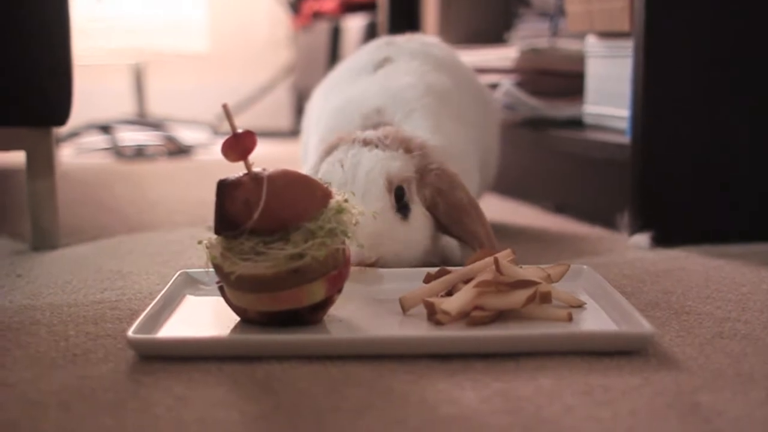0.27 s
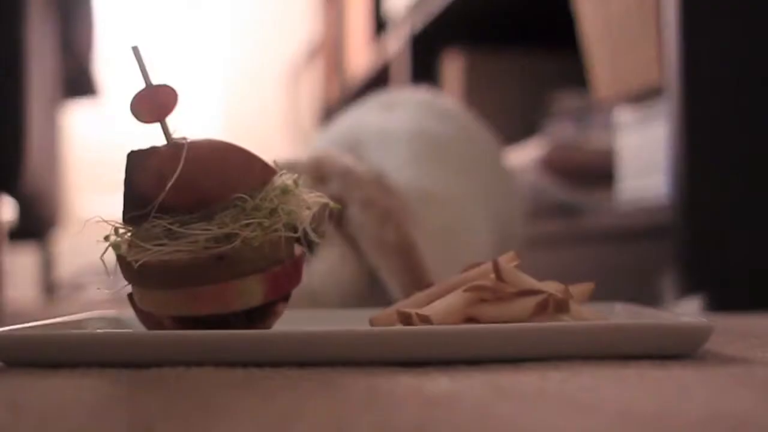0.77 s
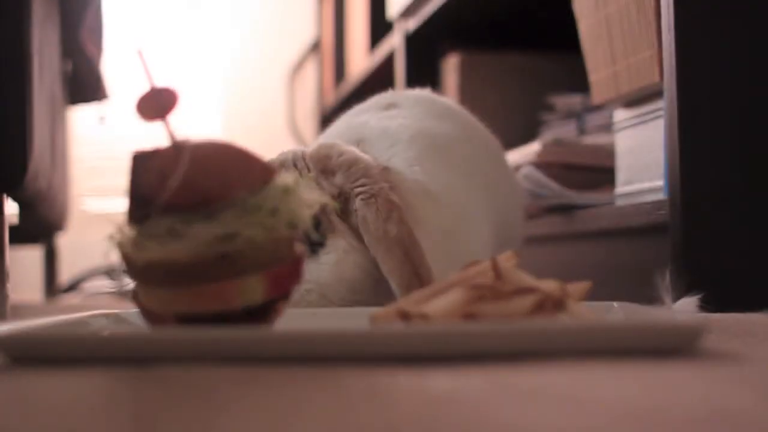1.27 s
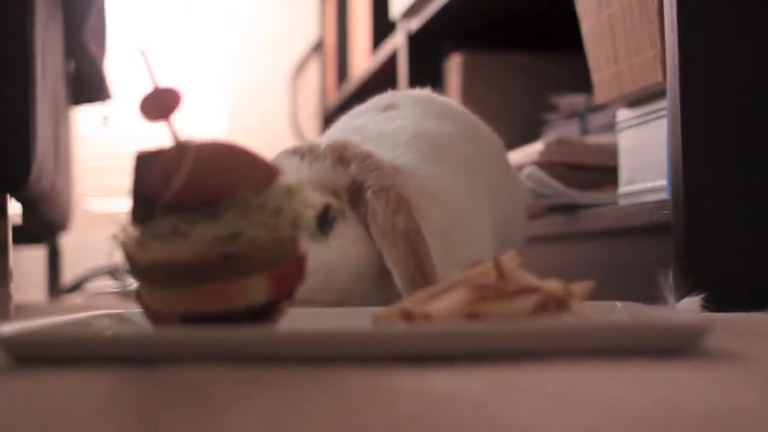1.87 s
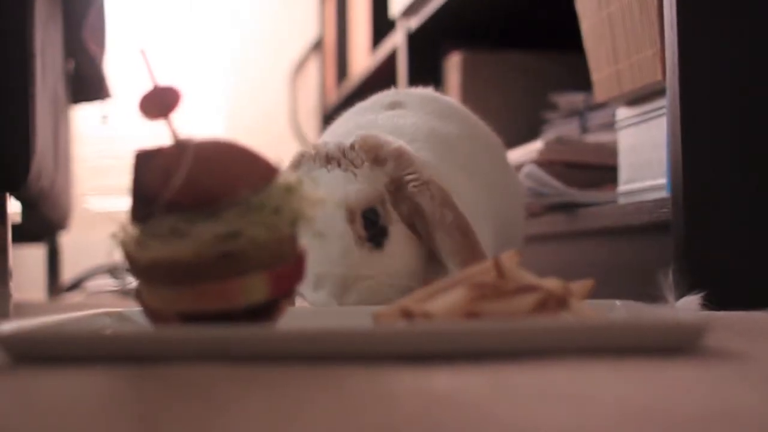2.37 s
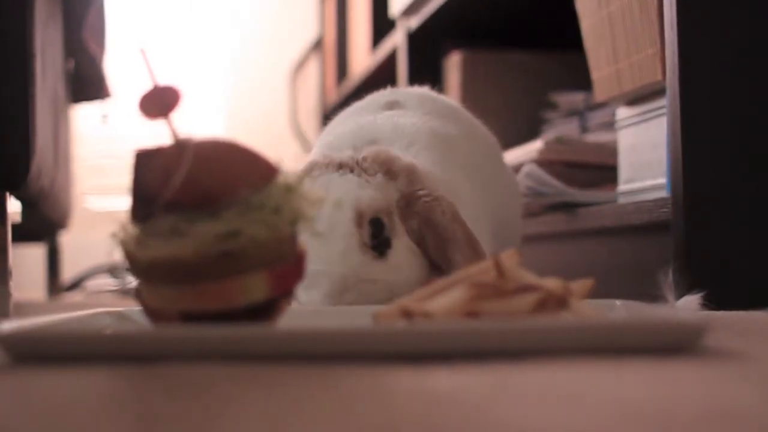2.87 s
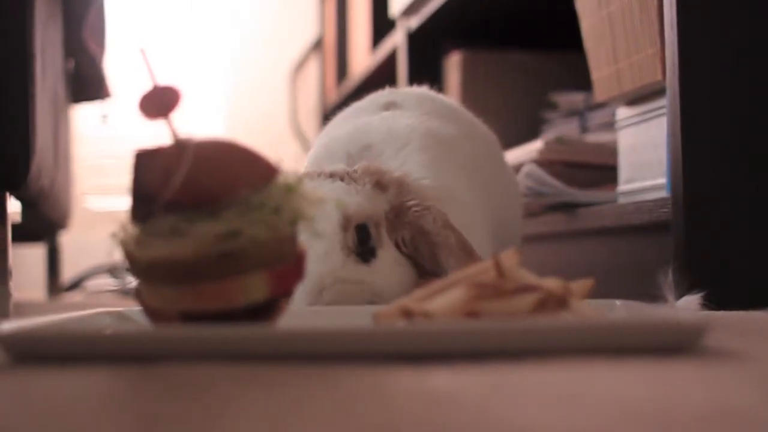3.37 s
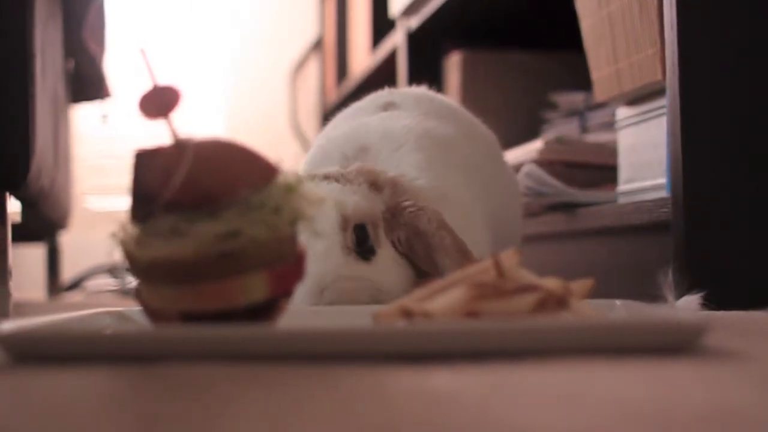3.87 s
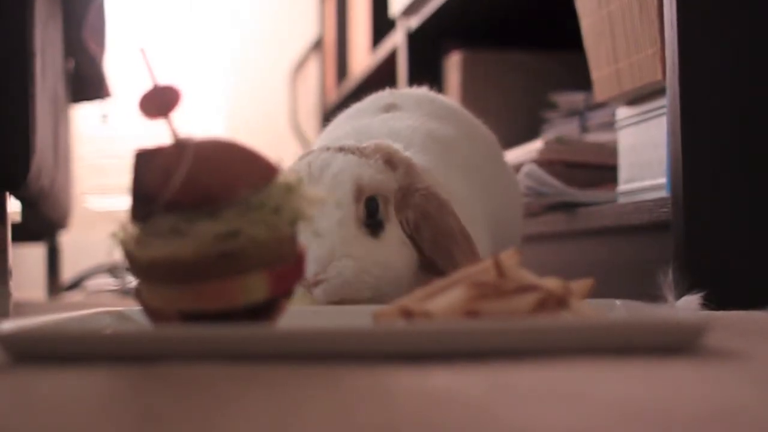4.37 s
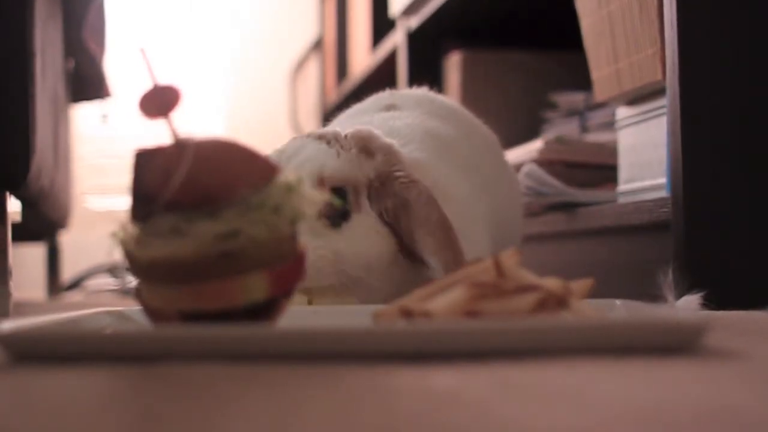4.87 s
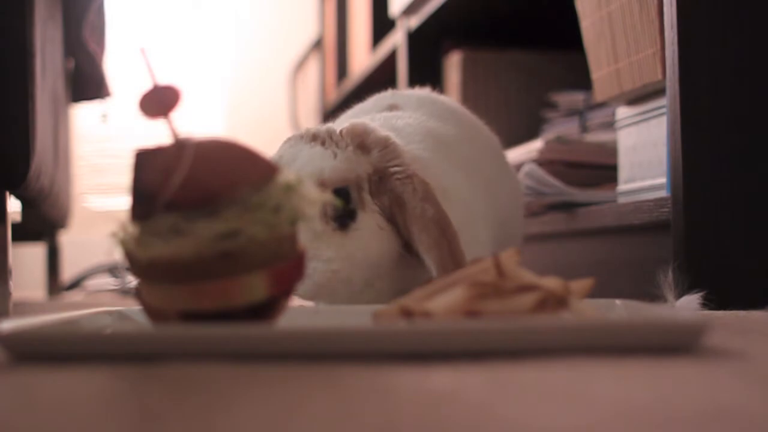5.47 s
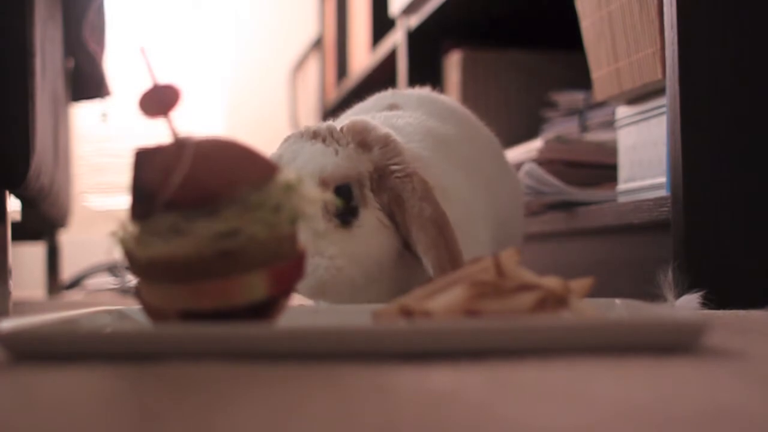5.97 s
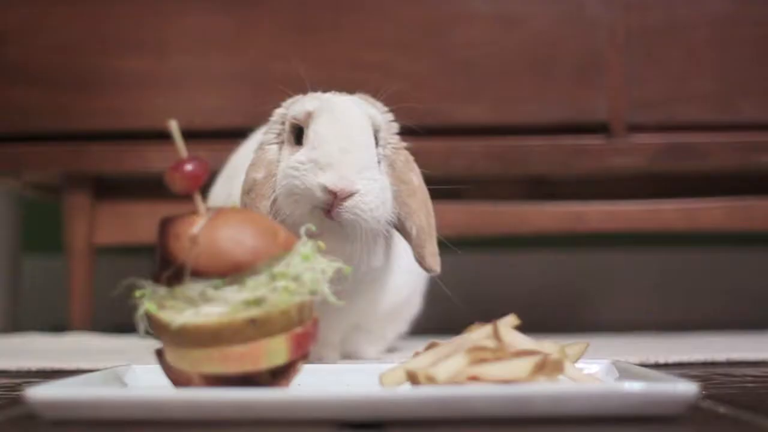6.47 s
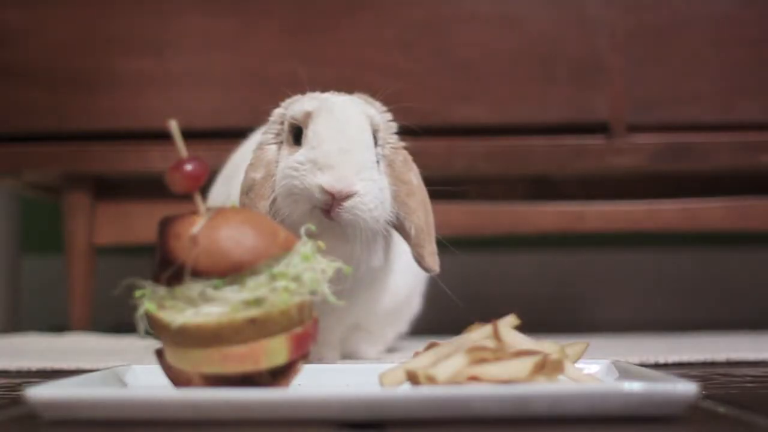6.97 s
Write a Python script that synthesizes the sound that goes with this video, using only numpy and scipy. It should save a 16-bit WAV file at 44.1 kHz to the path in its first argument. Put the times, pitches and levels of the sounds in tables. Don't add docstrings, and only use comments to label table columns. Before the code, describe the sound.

Close, quiet indoor rabbit chewing: hard little plate bounces, a burst of wet crunching, sparse ticks and lip clicks, two stem cracks, then renewed munching.

```python
import sys
import numpy as np
from scipy import signal
from scipy.fft import rfft, irfft, next_fast_len
from scipy.io import wavfile
from scipy.ndimage import uniform_filter1d, map_coordinates

SR = 44100
rng = np.random.default_rng(int(sys.argv[2]) if len(sys.argv) > 2 else 0)


def pcm_store(signal):
    levels = np.round(np.clip(np.atleast_2d(signal), -1, 1) * 32767)
    wavfile.write(sys.argv[1], SR, levels.astype(np.int16).T)


def convert_level_to_amplitude(level_db):
    exponent = np.asarray(level_db, float) / 20
    return 10 ** exponent


N = 317916

HISS_DB, HUM_DB, DEEP_DB = -60, -65.5, -76
CLICK_CYCLES, NIP_CYCLES, CLACK_CYCLES, THUMP_CYCLES = 2.2, 3.0, 4.2, 2.1
ROUNDNESS = 1.27
BITE_RISE = 0.6
GRIND_RISE_S, GRIND_FALL_S = 0.043, 0.074
SNATCH_RISE_S, SNATCH_FALL_S = 0.0063, 0.027
PUFF_RISE_S = 0.011
SQUEAK_ROUGH, SQUEAK_GRIT = 0.8, 0.3
FARTHER_S, FARTHER_DB = 6.568, -5
SNAP_ROOM_DB = -8
TOP_HZ = 15830

# pitch_hz, level_db (per Hz)
HISS_COLOUR = [(150, -32), (250, -3), (470, -8), (1360, -11), (2890, -13), (9830, -17), (14200, -20),
               (16300, -27)]
# peak_s, level_db, rise_s (20 dB), fall_s (20 dB)
STIRS = [
    (.5, -59, 0.7, 0.38),
    (1.89, -74, 2, .5),
    (2.4, -66, 1, 0.42),
    (6.05, -68, 1, 0.64),
]
# peak_s, level_db, rise_s (20 dB), fall_s (20 dB)
PASSES = [
    (1.45, -77, .8, 0.55),
    (3.1, -67.5, 1, 0.85),
    (5.52, -64.5, 1.5, 1),
    (6.75, -68, -2.5, 0.2),
]
# peak_s, level_db, rise_s (20 dB), fall_s (20 dB)
SWAYS = [
    (6.72, -63, -0.1, 0.4),
    (1.8, -71, 0.3, 0.16),
]
# start_s, peak_db, pitch_hz
LIP_CLICKS = [(0.114, -48, 1730), (1.267, -46, 1200), (1.435, -43, 1810), (1.607, -46, 1400),
              (1.825, -28, 1330), (3.055, -43, 1460), (3.067, -48, 1450), (3.448, -46, 1520),
              (3.675, -46, 1400), (3.77, -42.5, 1260), (3.991, -48.5, 1200), (4.0, -49, 920),
              (4.194, -49, 1330), (4.289, -45.5, 1260), (5.114, -52, 1340), (5.45, -48, 1360),
              (5.462, -52, 1420), (5.745, -41, 1040), (6.199, -49, 915), (6.442, -47.5, 1360)]
# start_s, peak_db, pitch_hz
NIPS = [
    (1.805, -33.5, 2630),
    (2.7, -43, 3220),
    (7.017, -38, 2590),
]
# start_s, peak_db, pitch_hz
CLACKS = [
    (0.136, -40.5, 1470),
    (1.713, -38, 2500),
    (4.323, -38.5, 2220),
]
# start_s, peak_db, pitch_hz
THUMPS = [
    (1.372, -50, 580),
    (4.431, -53.5, 270),
    (3.2, -52.5, 280),
    (4.629, -51, 226),
    (6.058, -56, 568),
]
# start_s, peak_db
VEIN_TICKS = [(0.2648, -43), (0.3087, -43), (1.267, -45), (2.811, -44.5), (2.8405, -48), (3.6764, -50),
              (3.8911, -53.5), (3.9074, -48), (3.9234, -45), (3.9814, -41), (4.0003, -41), (4.2901, -46),
              (4.3271, -52.5), (4.3635, -44), (4.3884, -48), (4.5067, -48), (4.7237, -43), (4.7404, -35.5),
              (4.7844, -39), (4.9606, -49), (4.9774, -56), (5.0214, -44), (5.2111, -46), (5.23, -39.5),
              (5.2514, -42), (5.4076, -41), (5.4274, -42), (6.4433, -50), (6.9486, -50)]
# start_s, peak_db, side (push or pull)
CELL_POPS = [(1.721, -29, -1), (1.7336, -34, 1), (1.918, -23, 1), (1.935, -25.5, -1), (1.972, -21, 1),
             (6.636, -43, 1), (6.759, -19.5, 1), (6.7628, -21, 1), (6.77, -29, 1), (6.776, -27, -1),
             (6.8115, -37, 1), (6.8149, -37, 1), (6.832, -34, -1)]
# start_s, peak_db, hardness (0-1)
BOUNCES = [
    (0.551, -15.5, 1),
    (0.587, -20, 0.55),
    (0.604, -23.5, 0.37),
    (0.632, -33, 0.22),
]
# pitch_hz, width_hz, level_db
PLATE = [(127, 21, 0), (325, 340, -3.5), (715, 220, 4), (1200, 420, -1.5), (2300, 240, -5),
         (3850, 320, -11.5)]
# middle_s,
# peak_db, pitch_hz, half_length_s
SLIPS = [(.871, -40.5, 920, .0012), (0.8713, -40, 337, 0.004), (2.7394, -44, 2300, 0.00092),
         (2.744, -49, 2500, 0.0034), (2.779, -46.5, 2300, .003), (2.785, -44, 2380, .003),
         (2.813, -38, 2370, 0.0017), (2.826, -37, 2400, 0.0016), (2.839, -39, 2600, 0.0014),
         (2.842, -43, 1900, 0.0021), (2.847, -42, 3100, 0.0029), (4.419, -47.5, 430, 0.0009),
         (5.344, -45.5, 300, 0.0018), (5.35, -50, 240, 0.002), (5.5826, -37.5, 1150, 0.00043),
         (5.583, -47, 2900, .001), (5.585, -34, 1600, .001), (5.588, -42, 1500, .0015),
         (5.593, -49, 1700, 0.0017), (5.611, -40.5, 3880, 0.00078), (5.613, -33.5, 2630, 0.00073),
         (5.613, -41, 1540, 0.0023), (5.6305, -36.5, 1490, 0.00027), (5.632, -38, 2140, 0.0014),
         (5.636, -43, 2190, 0.0039), (6.642, -34.5, 1200, 0.007), (6.651, -40, 1230, 0.0039),
         (6.655, -38, 1470, 0.0037), (6.664, -36, 1810, 0.0033), (6.772, -30.5, 1600, 0.0026),
         (6.806, -33.5, 930, 0.0022), (6.835, -35.5, 1830, 0.0016), (6.963, -37, 2760, 0.0016),
         (6.97, -38, 3800, 0.002), (6.976, -43, 3650, .003), (7.032, -36, 3630, .003),
         (7.061, -37, 1640, 0.0032), (7, -43, 2630, .006), (7.009, -47, 2600, .005),
         (7.16, -43, 2540, .004),
         (.6345, -42, 380, 0.00099), (.6355, -52, 2000, .001), (.642, -45, 200, 0.0016),
          (1.7155, -37, 260, 0.0023), (1.7155, -38, 4260, .0015), (1.7205, -29, 2460, 0.0017),
          (1.721, -34.5, 420, 0.0011), (1.7215, -38, 4320, 0.0016), (1.727, -39, 2580, 0.0024),
          (1.7335, -34, 4400, .002), (1.7345, -32, 330, 0.0018), (1.739, -34, 2800, 0.0015),
          (1.743, -34, 1470, 0.0054), (1.7445, -35, 2750, 0.0028), (1.743, -35, 4440, 0.0032),
          (1.7525, -34, 2900, 0.0037), (1.7585, -37, 352, 0.0014), (1.759, -32, 2680, 0.0012),
          (1.77, -50, 150, 0.0034), (1.8075, -43, 6200, .0015), (1.8275, -42, 3600, .0015),
          (1.873, -36, 1200, 0.0026), (1.92, -30.5, 1290, 0.007), (2.175, -39, 1270, .003),
          (2.395, -46.5, 1100, 0.0047), (2.4, -34.5, 3050, .004), (2.567, -51, 1200, .002),
          (2.65, -45, 850, 0.0043), (2.915, -44, 3380, 0.0064), (2.96, -54, 3000, .0015),
          (6.76, -33, 4330, .002), (6.785, -39, 7000, .004), (6.815, -40, 7800, .004),
          (6.838, -35.5, 5460, 0.0067), (6.79, -41, 800, 0.0018), (7.068, -36, 1900, 0.0033)]
# peak_s, mouth_db, fall_s (20 dB), jaw_db (re mouth), teeth_db (re mouth)
BITES = [(1.269, -65.5, 0.22, 3, 1), (1.706, -58, 0.09, -4, 1), (1.868, -43, 0.03, -7, -5.5),
         (1.896, -40, 0.14, -5, 3.5), (1.957, -35, 0.12, -11, -0.5), (2.14, -54, 0, 0.5, -1),
         (2.168, -50, 0.06, -1.5, 0.5), (2.388, -47, 0.12, 0.5, 0), (2.63, -58, 0.12, 4, 2),
         (2.668, -58, 0.07, 4.5, 4.5), (2.744, -54, -0.6, -17, -9.5), (2.822, -56, 0.08, 1, -3.5),
         (2.895, -57, 0.14, 1, 1), (3.45, -55, 0.02, -3, -7), (3.9, -69, 0.1, 7.5, 2), (4.0, -81, 0, 8, 4),
         (4.328, -69, 0.03, 5, -4), (4.56, -73, 0.13, 12.5, 4), (4.3, -70.5, 0.37, -3, 2.5),
         (5.011, -72, -0.75, 18.5, -3), (5.428, -80, 1.2, 9.5, 8.5), (6.172, -79, 2, 8.5, 0),
         (6.645, -49, 0.13, -3, 0), (7.064, -47.5, 0, 2.5, 1), (7.194, -50, 0.1, -2, -8)]
# start_s, mouth_db, hold_s, jaw_db (re mouth), teeth_db (re mouth)
GRINDS = [(0.884, -64, 0.31, 7.5, 2.5), (0.877, -70, 0.075, 13.5, 10), (1.79, -50.5, 0.028, -1.5, -3),
          (2.047, -52.5, 0.04, -2.5, -4), (2.192, -58.5, 0.2, 3, 1), (2.447, -59, 0.067, 6.5, 3),
          (6.705, -55.5, 0.091, -1, 3), (6.788, -48.5, 0.048, 1, 2), (6.888, -64, 0.015, -5, 1),
          (6.995, -55.5, 0.049, -11, -28), (7.05, -56, 0.06, 3, -5.5)]
# start_s, mouth_db, hold_s, jaw_db (re mouth), teeth_db (re mouth)
SNATCHES = [
    (1.716, -45.5, 0.034, 0.5, -6),
    (4.508, -64, 0.017, 2.5, 4),
    (4.722, -62.5, 0.03, 1.5, 3.5),
    (6.753, -47, 0.039, 3.5, 4.5),
    (6.95, -47, 0.036, -3, 0.5),
    (7.019, -53, 0.011, 1, 3.5),
]
# peak_s, fizz_db, rise_s (20 dB), fall_s (20 dB)
TEARS = [(.9, -57.5, .04, 0.5), (1.74, -40.5, 0.02, -0.02), (1.782, -50, 0, 0), (1.883, -46, 0, 0.2),
         (2.075, -51, 0.14, 0), (1.955, -35, 0.144, 0.11), (2.172, -56, .07, 0.14), (2.385, -61, 0, -0.04),
         (2.205, -64, -0.1, 0.1), (6.535, -41, -0.09, -0.24), (3.464, -57, -0.02, 0.03),
         (4.331, -48.5, 0.01, -0.04), (4.508, -52, -0.1, 0.1), (4.721, -49, -0.02, 0.05),
         (4.74, -46, -0.03, 0.02), (5.432, -49, -0.03, 0.02), (6.172, -67, 0.5, 0.2),
         (6.61, -59, 0.1, -0.5), (6.65, -47, 0.06, 0.35), (6.72, -60, .1, .1), (6.86, -53, 0.08, .04),
         (6.985, -56, -0.03, 0.15), (6.76, -43, 0.03, 0.12), (6.81, -41.5, 0.02, 0.09), (6.89, -62, 0, -3),
         (6.952, -50.5, .008, 0.2), (7.028, -51, -0.2, -0.16), (7.072, -51.5, 0.1, -0.1),
         (7.17, -60, -1.5, 0)]
# peak_s, edge_db, rise_s (20 dB), fall_s (20 dB)
RASPS = [(1.74, -72, 0, -2), (1.79, -66, 0.2, -3), (1.95, -54.5, 0.04, .08), (2.04, -50, 0.03, 0.03),
         (2.31, -67, 2, 0.5), (4.31, -71, 0.4, 0.5), (4.725, -60.5, 0.05, 0.24), (6.545, -64, 0.26, -1),
         (6.66, -63, 0.4, 0), (6.768, -44, 0.02, 0.07), (6.81, -43, 0.09, 0.02), (7.066, -60, -0.9, 0.1)]
# peak_s, level_db, rise_s (20 dB), fall_s (20 dB)
SHEARS = [(1.885, -50, 0.1, 0), (1.93, -60, 0.12, -0.05), (2.075, -51.5, .1, -0.1), (2.41, -62, .05, 0.1),
          (2.5, -69, 1.3, 1.5), (2.67, -62, 0.4, 0.2), (6.983, -60, 0.3, 0), (7.03, -56.5, 0.2, 0.2),
          (6.86, -58, 0.6, .03)]
# pitch_hz, width_hz, level_db
JAW = [(450, 335, -6), (822, 454, 1), (1200, 770, 2), (1700, 570, 0.5)]
# pitch_hz, width_hz, level_db
MOUTH = [(2500, 820, 1), (3015, 530, 0)]
# pitch_hz, width_hz, level_db
TEETH = [(3640, 400, -2), (3870, 190, 4), (4570, 1480, 0)]
# pitch_hz, level_db (per Hz)
NEAR_LEAF = [(6500, -72), (8500, -5), (10000, -0.5), (11200, 1), (12800, 0.5), (14500, -0.5), (16000, -3.5)]
# pitch_hz, level_db (per Hz)
FAR_LEAF = [(6500, -72), (8500, -20), (10000, -4), (11000, 1.5), (12800, 3), (14500, -2), (16000, -4.5)]
# peak_s, level_db, rise_s (20 dB), fall_s (20 dB)
NUDGES = [
    (1.722, -37.5, 0, 0.14),
    (1.83, -44.5, -2, 0.16),
    (6.67, -68, 1, 0.12),
]
# start_s, level_db, hold_s, fall_s (20 dB)
PUFFS = [(3.888, -61, 0.067, 0.2), (3.98, -58, .03, .05), (3.432, -65, .035, 0), (4.297, -54, .04, .03),
         (4.354, -62, .012, .07), (4.506, -56, .035, 0.03), (4.724, -51, .04, .03), (4.782, -55, 0.007, 0),
         (4.974, -54.5, .058, 0), (5.045, -67.5, .02, 0.5), (5.207, -59, 0.052, .04),
         (5.405, -58, .01, .02), (5.418, -51.5, .02, .08)]
# pitch_hz, level_db (per Hz)
PULP = [(7000, -60), (9000, -11), (10300, -2), (11200, 1), (12500, -1), (13200, -2), (14800, -1),
        (16000, -4.5)]
# start_s, peak_db, treble_db, split_s, creak_db (lead-in), held_s (still after)
SNAPS = [
    (5.9277, -15, -4, 0.0042, -13.5, .05),
    (6.5177, -15.5, -15.5, 0.0014, -48, 0.00425),
]
# pitch_hz, level_db, rise_s, t60_s
STEMS = [
    [(300, -19, 0.00096, 0.016), (550, -13, 0.00088, 0.01), (940, -15.5, 0.00083, 0.031),
     (1560, -11, 0.001, 0.019), (1810, -11, 0.0036, 0.032), (2480, -28, 0.0011, 0.014),
     (2780, -14, 0.0013, 0.022), (3030, -21, 0.0013, 0.026), (3530, -11, 0.0013, 0.019),
     (3874, 7, 0.0018, 0.013), (4300, -1, 0.00088, 0.012), (11800, -3, 0.0013, 0.0084),
     (5700, -9, 0.00066, 0.016), (7050, -13, 0.0017, 0.025)],
    [(710, -2.5, 0.0005, 0.0085), (1600, -4, 0.00044, 0.017), (2000, -7, 0.00042, .012),
     (2370, -7.5, 0.0005, 0.02), (2790, -7.5, 0.00042, 0.026), (3900, 2, 0.00047, 0.008),
     (5030, -24, .0004, 0.018), (5860, -19, 0.0003, 0.013), (6800, -19, .0004, .008),
     (9200, -17, 0.00046, 0.012), (11100, -25, .0004, 0.0062)],
]
HELD_SIDES = [1, 1, -1, 1, -1, -1, 1, -1, 1, -1, 1]
# pitch_hz, t60_s
ROOM_TAIL = [(200, 0.52), (2000, 0.083), (4000, 0.084), (10000, 0.16)]
# middle_s, silence_s, out_s, in_s
CHANGES = [
    (0.821, 0.0064, 0.063, 0.027),
    (6.568, 0.01, 0.11, 0.031),
]


def unit(x):
    return x / np.sqrt(np.mean(x ** 2) + 1e-20)


def peaked(x):
    return x / np.abs(x).max()


def along(points, hz):
    f, v = np.transpose(points)
    return np.interp(np.log(hz + 1), np.log(f + 1), v)


def wobble(rate):
    knots = rng.standard_normal(int(N * rate / SR) + 4)
    return map_coordinates(knots, [np.arange(N) * rate / SR])


def decay(t, t60_s):
    return convert_level_to_amplitude(-60 * t / t60_s)


def filtered(x, response):
    m = next_fast_len(len(x) + 8192)
    return irfft(rfft(x, m) * response(np.fft.rfftfreq(m, 1 / SR)), m)[:len(x)]


def resonances(modes):
    def response(f):
        return sum((-1) ** k * convert_level_to_amplitude(db) * 1j * f * w / (c * c - f * f + 1j * f * w + 1e-9)
                   for k, (c, w, db) in enumerate(modes))
    return response


def resonance(hz, width_hz):
    return resonances([(hz, width_hz, 0)])


def below(hz):
    return lambda f: 1 / (1 - (f / hz) ** 2 + 1.3j * f / hz) ** 3


def colour(points):
    return lambda f: convert_level_to_amplitude(along(points, f))


def steady_noise(response):
    return unit(filtered(rng.standard_normal(N), response))


def add(track, s, sound):
    track[round(s * SR):][:len(sound)] += sound


def level_db(power):
    return np.interp(np.arange(N) * 1000 / SR, np.arange(len(power)), 10 * np.log10(power + 1e-14))


def swell(s, rise, fall, hold=0):
    t = np.arange(1000 * N // SR + 2) / 1000 - s
    before, after = -t / max(rise, .003), (t - hold) / max(fall, .003)
    away = np.maximum(np.maximum(before, after), 0)
    return convert_level_to_amplitude(-40 * np.minimum(away ** ROUNDNESS, 6))


def swells_db(rows, floor_db=-120):
    power = sum(convert_level_to_amplitude(2 * db) * swell(s, rise, fall) for s, db, rise, fall in rows)
    return level_db(power + convert_level_to_amplitude(2 * floor_db))


def crackle(rate, spread_db, smooth):
    sizes = convert_level_to_amplitude(spread_db * np.minimum(rng.exponential(size=N), 3.5)) * rng.choice([-1, 1], size=N)
    bursts = sizes * (rng.random(N) < rate / SR)
    return unit(bursts) + smooth * rng.standard_normal(N)


def background():
    hiss = steady_noise(colour(HISS_COLOUR))
    hum = steady_noise(resonances([(107.0, 61, 6), (209, 100, -3.5)]))
    deep = steady_noise(resonance(70.7, 26))
    sway = steady_noise(lambda f: resonance(33, 22)(f) ** 2)
    hum_db = swells_db(STIRS, HUM_DB) + 0.33 * wobble(2.65)
    deep_db = swells_db(PASSES, DEEP_DB) + 2.0
    return convert_level_to_amplitude(swells_db(SWAYS)) * sway + convert_level_to_amplitude(HISS_DB) * hiss + convert_level_to_amplitude(hum_db) * hum + convert_level_to_amplitude(deep_db) * deep


def clicks():
    out, t = np.zeros(N + SR), np.arange(SR // 20) / SR
    kinds = [(LIP_CLICKS, CLICK_CYCLES), (NIPS, NIP_CYCLES), (CLACKS, CLACK_CYCLES), (THUMPS, THUMP_CYCLES)]
    for rows, cycles in kinds:
        for s, db, hz in rows:
            u = t * hz / cycles
            cavity = peaked(u * np.exp(-2.5 * u) * np.sin(2 * np.pi * hz * t))
            burst = rng.standard_normal(len(t)) * decay(t, 0.019)
            grit = filtered(burst, lambda f: below(2.2 * hz)(f) * resonance(hz, 2 * hz)(f))
            first = cavity + 0.76 * peaked(grit)
            late = lambda lag: np.interp(t - lag, t, first, 0)
            heard = first - 0.29 * late(0.001994) + 0.3 * late(0.0084) - 0.1 * late(0.0034)
            add(out, s + 0.00031, convert_level_to_amplitude(db) * peaked(heard))
    for s, db in VEIN_TICKS:
        burst = rng.standard_normal(len(t)) * decay(t, 0.0091)
        crack = filtered(burst, lambda f: resonance(12000, 9000)(f) ** 2)
        add(out, s, convert_level_to_amplitude(db - 0.5) * peaked(crack))
    for s, db, side in CELL_POPS:
        u = (t - .0005) / .00007
        add(out, s - .0005, -np.sign(side) * convert_level_to_amplitude(db) * (1 - 1.08 * u * u) * np.exp(-u * u / 2))
    return out[:N]


def bounces():
    blows, t = np.zeros(N + SR), np.arange(SR // 20) / SR
    for s, db, hard in BOUNCES:
        width = .0001 / np.clip(hard, .2, 2)
        touch = lambda lag: np.exp(-((t - lag) / width) ** 2) / width / SR
        thud = np.exp(-((t - .0078) / 0.00077) ** 2)
        rattle = filtered(rng.standard_normal(len(t)) * decay(t, 0.033) * (t > .002), below(2360))
        blow = 0.45 * touch(0.00224) - touch(0.000985) - 0.028 * thud + 0.058 * rattle
        add(blows, s, convert_level_to_amplitude(db + 22.0) * blow)
    return filtered(blows[:N], resonances(PLATE))


def squeaks():
    out, t = np.zeros(N + SR), np.arange(-SR // 50, SR // 50) / SR
    for s, db, hz, half in SLIPS:
        noise = rng.standard_normal(len(t))
        fray = unit(filtered(noise, lambda f: resonance(hz, 0.45 * hz)(f) ** 2))
        grit = unit(filtered(noise, lambda f: resonance(2 * hz, 2 * hz)(f) * below(3 * hz)(f)))
        tone = np.cos(2 * np.pi * hz * t + 9 * rng.standard_normal())
        sound = tone + (SQUEAK_ROUGH * fray + SQUEAK_GRIT * grit) * min(half / .003, 1)
        add(out, s - 1 / 50, convert_level_to_amplitude(db) * peaked(np.exp(-(t / half) ** 2) * sound))
    return out[:N]


def effort():
    shapes = [swell(s, BITE_RISE * fall, fall) for s, _, fall, *_ in BITES]
    shapes += [swell(s, GRIND_RISE_S, GRIND_FALL_S, hold) for s, _, hold, *_ in GRINDS]
    shapes += [swell(s, SNATCH_RISE_S, SNATCH_FALL_S, hold) for s, _, hold, *_ in SNATCHES]
    levels = [(db, db + jaw_db, db + teeth_db) for _, db, _, jaw_db, teeth_db in BITES + GRINDS + SNATCHES]
    mouth, jaw, teeth = map(level_db, convert_level_to_amplitude(2 * np.transpose(levels)) @ np.array(shapes))
    return mouth, jaw - mouth, teeth - mouth


def chewing():
    (mouth_db, jaw_db, teeth_db), fizz_db = effort(), swells_db(TEARS)
    farther = np.arange(N) > FARTHER_S * SR
    clumps = 0.84 * wobble(49)
    cells = crackle(3500, spread_db=4.5, smooth=1.0)
    dull_cells = crackle(2500, spread_db=2.5, smooth=0.91)

    mouth = filtered(cells, lambda f: resonances(MOUTH)(f) * resonance(2900, 2200)(f) * below(4200)(f))
    mouth = unit(mouth * convert_level_to_amplitude(clumps))
    teeth = filtered(cells, lambda f: resonances(TEETH)(f) * below(5600)(f))
    teeth = unit(teeth * convert_level_to_amplitude(clumps + 0.3 * wobble(40)))
    jaw = filtered(dull_cells, lambda f: resonances(JAW)(f) * below(2600)(f))
    jaw = unit(jaw * convert_level_to_amplitude(clumps + 1.1 * wobble(40)))
    skull = filtered(rng.standard_normal(N), resonance(273, 142))
    skull = unit(skull * convert_level_to_amplitude(0.75 * wobble(54)))
    boom = jaw + convert_level_to_amplitude(-6.5 + FARTHER_DB * farther) * skull
    crunch = mouth + convert_level_to_amplitude(teeth_db) * teeth + convert_level_to_amplitude(jaw_db) * boom

    shivers = np.interp(fizz_db, [-55, -42], [1.8, .8]) * wobble(150)
    veins = crackle(2700, spread_db=-3.5, smooth=0.74) * convert_level_to_amplitude(clumps + shivers)
    near_leaf = unit(filtered(veins, colour(NEAR_LEAF)))
    far_leaf = unit(filtered(veins, colour(FAR_LEAF)))
    leaf = np.where(farther, far_leaf, near_leaf)

    shear = unit(filtered(cells, lambda f: resonance(4700, 1300)(f) ** 2) * convert_level_to_amplitude(clumps))
    edge = unit(filtered(veins, lambda f: resonance(7200, 4500)(f) ** 2))
    rasp = unit(filtered(cells, lambda f: resonance(6400, 2200)(f) ** 2))
    edge_db = 0.5 * (mouth_db + teeth_db) + 0.46 * fizz_db - 6.5
    scrapes = convert_level_to_amplitude(edge_db) * edge + convert_level_to_amplitude(swells_db(RASPS)) * rasp + convert_level_to_amplitude(swells_db(SHEARS)) * shear
    return convert_level_to_amplitude(mouth_db) * crunch + convert_level_to_amplitude(fizz_db) * leaf + scrapes


def nudge():
    drag = steady_noise(resonances([(70.5, 110, -0.27), (204, 124, -1.6)]))
    return convert_level_to_amplitude(swells_db(NUDGES) - 7.0 + 2.8 * wobble(44.4)) * drag


def puffs():
    power = sum(convert_level_to_amplitude(2 * db) * swell(s, PUFF_RISE_S, fall, hold) for s, db, hold, fall in PUFFS)
    z = signal.stft(crackle(2000, spread_db=2.5, smooth=1.0), nperseg=256)[2]
    patches = uniform_filter1d(rng.standard_normal(z.shape), size=5, axis=0)
    patches = uniform_filter1d(patches, size=8, axis=1)
    fizz = signal.istft(z * convert_level_to_amplitude(1.3 * unit(patches)), nperseg=256)[1][:N]
    fizz = fizz * convert_level_to_amplitude(1.6 * wobble(210))
    return convert_level_to_amplitude(level_db(power)) * unit(filtered(fizz, colour(PULP)))


def snaps():
    out, t = np.zeros(N + SR), np.arange(SR // 10) / SR
    phases = [rng.random(len(STEMS[0])), (1 - np.array(HELD_SIDES)) / 4]
    for (s, db, treble_db, split, creak_db, held), modes, turns in zip(SNAPS, STEMS, phases):
        ring = np.zeros(len(t))
        for (hz, level, rise, t60), turn in zip(modes, turns):
            envelope = convert_level_to_amplitude(level) * decay(t, t60) * (1 - np.exp(-(t / rise) ** 2))
            ring += envelope * np.sin(2 * np.pi * (hz * t + turn))
        shards = rng.standard_normal(len(t)) * (1 - np.exp(-t / 0.00051)) * decay(t, 0.057)
        splinters = peaked(filtered(shards, lambda f: below(4800)(f) * resonance(1800, 4500)(f) ** 2))
        volley = rng.standard_normal(len(t)) * (t / split) ** 2 * np.exp(-5 * t / split)
        spit = peaked(filtered(volley, lambda f: resonance(11300, 3500)(f) * below(13000)(f)))
        body = ring + 0.37 * splinters
        body = 0.2 * body / np.linalg.norm(body) / 0.035
        grip = 1 + (t / held) ** 30
        add(out, s, convert_level_to_amplitude(db) * (body + convert_level_to_amplitude(treble_db) * spit) / grip)
        add(out, s - .0027, convert_level_to_amplitude(db + creak_db) * splinters)
    return out[:N]


def room(x):
    hz, t, z = signal.stft(rng.standard_normal(SR // 4), SR, nperseg=256)
    tail = signal.istft(z * decay(t, along(ROOM_TAIL, hz)[:, None]), SR, nperseg=256)[1]
    return signal.fftconvolve(np.pad(x, (250, 0)), tail / np.linalg.norm(tail))[:N]


def scene():
    taps, stems = clicks() + bounces() + squeaks(), snaps()
    reflected = convert_level_to_amplitude(-20.5) * room(taps + convert_level_to_amplitude(SNAP_ROOM_DB) * stems)
    mix = background() + taps + chewing() + nudge() + puffs() + stems + reflected
    return mix[None]


def roll_off(x):
    return signal.sosfilt(signal.butter(12, 16480, fs=SR, output="sos"), x)


def record(dry):
    t, gain = np.arange(N) / SR, np.ones(N)
    for s, gap, fade_out, fade_in in CHANGES:
        corners = [s - fade_out, s - gap / 2, s + gap / 2, s + fade_in]
        gain *= np.interp(t, corners, [0.9, 0.0031, 0.0027, 0.91])
    heard = filtered(dry[0] * np.sin(np.pi / 2 * gain), lambda f: f < TOP_HZ)
    return roll_off(heard[None])


dry = scene()
out = record(dry)
pcm_store(out)
```